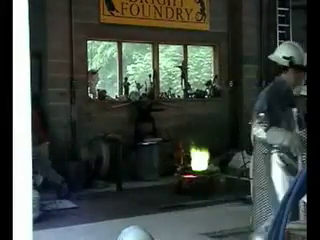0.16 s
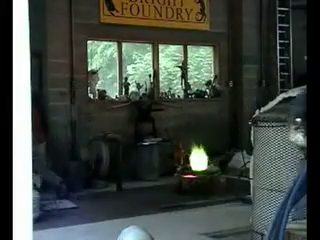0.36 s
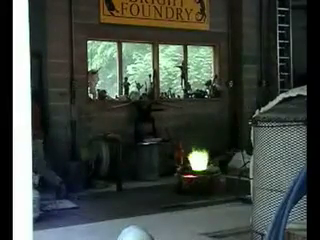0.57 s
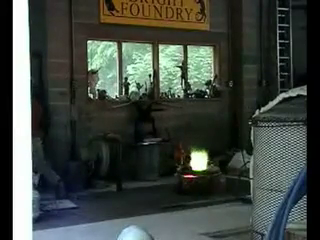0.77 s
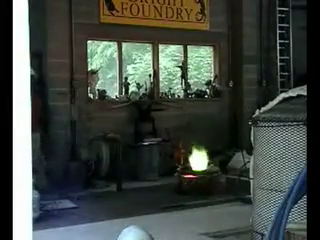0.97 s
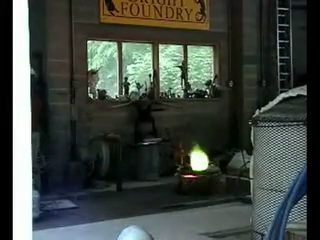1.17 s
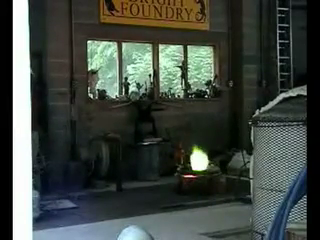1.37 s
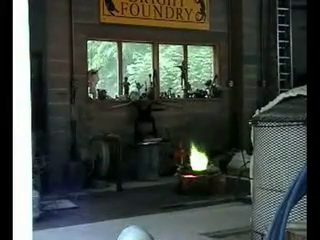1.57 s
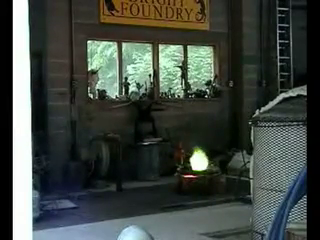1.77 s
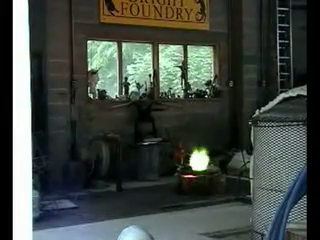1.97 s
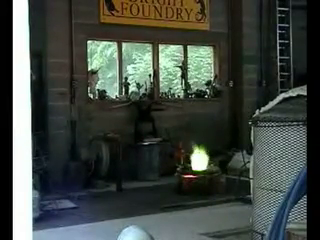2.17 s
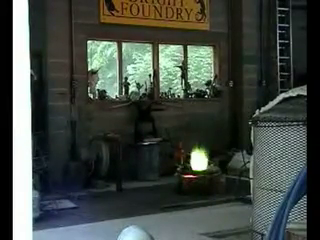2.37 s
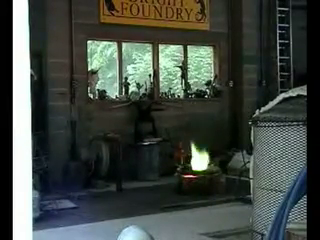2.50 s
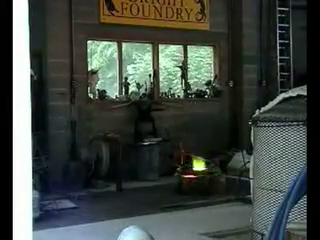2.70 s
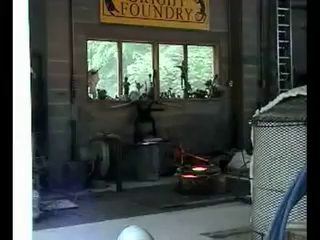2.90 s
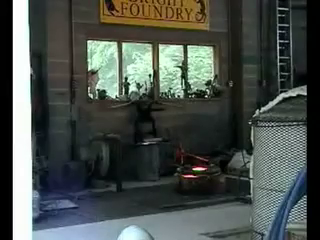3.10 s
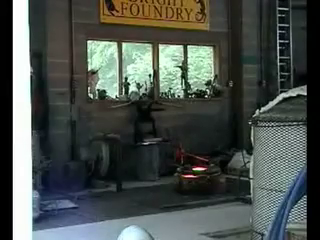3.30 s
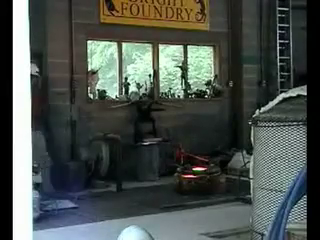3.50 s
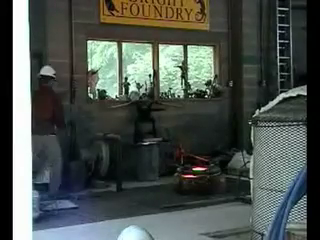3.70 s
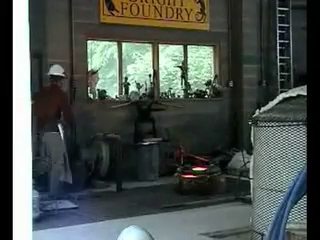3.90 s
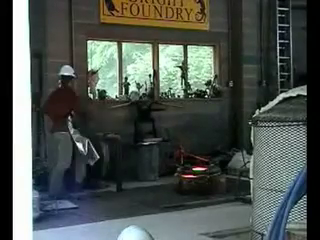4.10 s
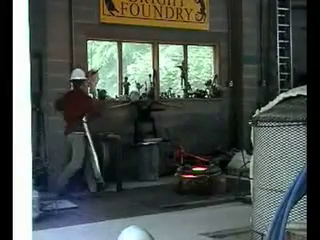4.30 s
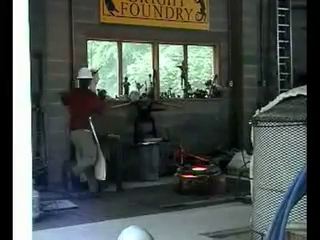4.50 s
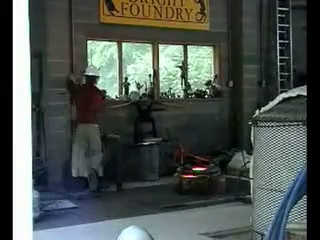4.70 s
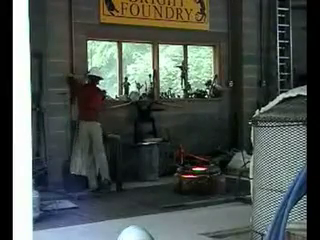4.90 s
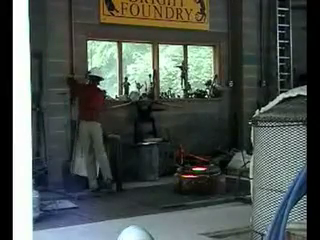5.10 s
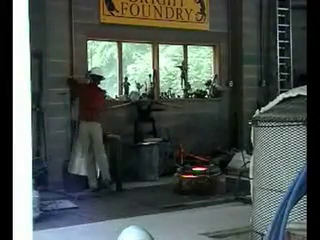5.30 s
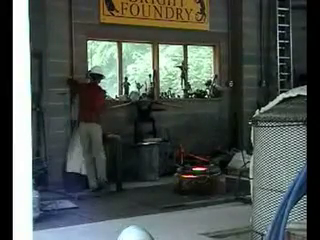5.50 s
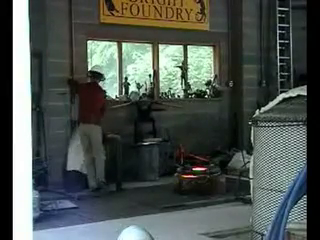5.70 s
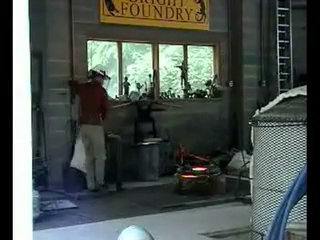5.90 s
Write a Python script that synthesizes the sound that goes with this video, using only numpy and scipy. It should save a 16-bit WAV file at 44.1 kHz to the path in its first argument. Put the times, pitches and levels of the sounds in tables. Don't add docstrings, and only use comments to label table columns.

```python
import sys
import numpy as np
from scipy import signal
from scipy.io import wavfile
from scipy.ndimage import uniform_filter1d

SR = 44100
rng = np.random.default_rng(int(sys.argv[2]) if len(sys.argv) > 2 else 0)


def gain_from_decibels(decibels):
    exponent = np.asarray(decibels, float) / 20
    return 10 ** exponent


def pcm_store(signal):
    levels = np.round(np.clip(np.atleast_2d(signal), -1, 1) * 32767)
    wavfile.write(sys.argv[1], SR, levels.astype(np.int16).T)


N = 267246
TIME = np.arange(N) / SR

# pitch_hz, width_hz, level_db
CHAMBER_MODES = [(166.6, 33.7, 0.5), (203.4, 30, -4)]
# pitch_hz, width_hz, level_db
FLUE_MODES = [(289, 23, 1.5), (350.6, 53, 3), (422.7, 60, -3.5), (520.3, 30, -5.5), (597, 23, -6),
              (707, 130, -2)]
# time_s, spread_s, duct_hum_db, flue_roar_db, hiss_db
SURGES = [(.03, .04, -5.5, 3, 1.5), (.13, .05, 1, -5.5, -1.5), (.28, 0.068, 1, 1.5, 2),
          (.66, 0.061, 6, 0.5, 3.5), (.9, 0.074, 3.5, -2.5, -0.5), (1.1, .1, 6.5, -0.5, 0),
          (1.28, .08, 0, 2.5, 1.5), (1.42, 0.046, -2, 1.5, 2), (1.7, 0.086, -0.5, 1, 1.5),
          (2.0, .12, 3, 1.5, 0), (2.35, 0.1, -2.5, 1, 1), (2.6, 0.057, -1.5, -0.5, 1.5)]
# pitch_hz, level_db (per Hz)
AIR_SPECTRUM = [(53, -41), (90, -21.5), (120, -7.5), (227, -7), (643, -3.5), (736, -12.5), (885, -13),
                (1200, -13), (1470, -16), (1650, -22), (1950, -16.5), (3450, -17), (3760, -17.5),
                (4600, -29)]
# pitch_hz, width_hz, level_db
CASING_MODES = [(744, 68, -12), (1216, 51, -13), (1449, 110, -1), (1934, 86, -3), (2697, 19, -5.5),
                (3814, 130, -1), (4200, 67, -10.5)]
# pitch_hz, level_db
LOWER_WHINE = [(715.7, 2.5), (730, -5), (710, -22.5)]
UPPER_WHINE = [(761, 3), (774, -7.5)]
HIGH_WHINE = [(3760, 0), (3668, -4), (3715, -11)]
# pitch_hz, level_db (above the air)
WEAK_ROTOR_TONES = [(1818, -20), (2546, -20), (2685, -22), (2730, -21.5), (3252, -25), (3962, -21.5),
                    (4161, -21), (4206, -26), (4388, -25)]
# pitch_hz, level_db (above the air)
SECOND_MOTOR_TONES = [(1208, -11.5), (1274, -23.5), (1454, -15), (1499, -22.5)]
PATH_LAGS = [0, .07, .16]
# time_s, spread_s, lower_db, upper_db
LICKS = [(.03, 0.085, 5, -1), (.45, .06, 8, 4.5), (.77, 0.04, 0, 6.5), (1.07, 0.037, 3, 7),
         (1.36, .06, 7, -1.5), (1.47, 0.06, -2.5, 8), (1.77, 0.035, 8, 5), (2.13, 0.054, 9, 0.5)]
# time_s, spread_s, lower_db, upper_db, high_db
CROSSING = [
    (3.2, 0.12, -1, -2, 4.5),
    (3.6, 0.42, 4.5, -2, 4.5),
    (4.15, 0.23, 0, 4, 1),
    (4.5, .1, 2, 2.5, 1.5),
    (5.0, 0.3, -4.5, 2, -4.5),
    (5.5, 0.42, -1, 4, 1),
]
# time_s, spread_s, level_db
FAINT_SWELL = (5.1, .5, 8)
# time_s, level_db
VALVE_LEVEL = [
    (2.03, -40),
    (2.1, -24),
    (2.2, -21),
    (2.26, -20),
    (2.35, -21.5),
    (2.38, -30),
    (2.45, -45),
]
# pitch_hz, width_hz, level_db
PIPE_MODES = [(1320, 33, -11), (1930, 26, -8), (2270, 37, -16), (2640, 30, -1), (2850, 25, -7),
              (3430, 40, -3), (3700, 60, -14), (4310, 35, -4)]
# time_s, spread_s
GRIP = [(2.25, .06), (2.22, .15), (2.3, .08), (2.23, .06), (2.31, .05), (2.26, .11), (2.3, .06),
        (2.28, .09)]
# time_s, level_db, length_s, centre_hz
SCUFFS = [
    (4.1, -38, 0.051, 1400),
    (1.78, -22, 0.05, 880),
    (2.4, -16.5, 0.025, 400),
    (4.48, -26.5, 0.023, 4000),
    (4.5, -26, 0.16, 1500),
]
# pitch_hz, width_hz, level_db
DUCT_MODES = [(122.1, 22, 0)]
# time_s, spread_s, rumble_db, duct_hum_db
DRAUGHT = [
    (3.5, 0.25, 3, 1.5),
    (4.25, .15, 3.5, 2.5),
    (5.35, .1, 3.5, 4),
    (5.75, 0.32, 6.5, 3.5),
]
# pitch_hz, level_db
MIRRORS = [(12100, -67), (16000, -62)]

SHUT_S, SHUT_SOFT_S = 2.712, .02
SHUT_DROP_DB = 3
BOOM_DB, BOOM_FADE_DB_S = -6.5, 52
ROAR_DB, ROAR_FADE_DB_S = -13, 107.5
RUMBLE_DB, JET_DB = -30.5, -30.5
FAN_DB, HISS_DB, AIR_DB = -27, 2, 2.5
LOWER_DB, UPPER_DB, HIGH_DB, FAINT_DB, SECOND_DB = -28.5, -32, -32.5, -42, -43
LICK_REST_DB = 2
HAZE_DB, FLUTTER_HOT_DB = -0.5, 4
WANDER_HOT, WANDER_COLD, WANDER_COAST = .012, .0009, .0045
CUT_S, COAST_SHARE, COAST_S = 5.75, .11, .3
HUM_DB, HUM_FADE_DB_S, HUM_COLD_DB = -16.5, 93, -34.5
FLOOR_DB, FLOOR_COLD_DB = -37, -40.5
GAIN_CREEP_DB, GAIN_CREEP_S = 5.5, 1.17
TOP_HZ, CLIP = 4585, .785


def flame():
    boom = body(CHAMBER_MODES) + gain_from_decibels(RUMBLE_DB) * body([(264, 230, 0)])
    boom_gain = gain_from_decibels(BOOM_DB - SHUT_DROP_DB * (1 - burning(400))) * burning(BOOM_FADE_DB_S)
    roar_db = ROAR_DB + swells(SURGES)[1] + 1.5 * walk(rate=16)
    jet = gain_from_decibels(JET_DB) * unit(ring(noise(), 1100, 900))
    roar = gain_from_decibels(roar_db) * body(FLUE_MODES) + jet
    return boom_gain * boom + burning(ROAR_FADE_DB_S) * roar


def blower():
    hot = burning(60)
    coast = 1 - np.exp(-after(CUT_S) / COAST_S)
    wander = WANDER_COLD + WANDER_HOT * hot + WANDER_COAST * coast
    speeds = [np.interp(TIME - lag, TIME, 1 - COAST_SHARE * coast) for lag in PATH_LAGS]
    paths = np.cumsum(speeds, axis=1) / SR
    turns = paths[0]

    flutter = FLUTTER_HOT_DB * hot * [walk(rate=10) for _ in range(3)]
    lower_db, upper_db, high_db = swells(CROSSING) + flutter
    lick_lower_db, lick_upper_db = swells(LICKS) - LICK_REST_DB * hot
    lower_db = LOWER_DB + lower_db + lick_lower_db + 5.8 * coast + 2.7 * bump(6.04, .08)
    upper_db = UPPER_DB + upper_db + lick_upper_db + 4.1 * coast
    high_db = HIGH_DB - 8 + high_db - 2.9 * hot - 14 * coast
    faint_db = FAINT_DB + swells([FAINT_SWELL])[0]
    second_db = SECOND_DB - 5.7 * hot + 6 * coast

    weak = whine(WEAK_ROTOR_TONES, turns, .6 * wander, waver_db=3)
    weak = weak + whine(SECOND_MOTOR_TONES, TIME, .7 * wander, waver_db=3)
    rush = gain_from_decibels(HISS_DB * hot + swells(SURGES)[2]) * air()
    out = gain_from_decibels(FAN_DB) * (rush + gain_from_decibels(HAZE_DB * hot - .5) * weak)
    out += gain_from_decibels(faint_db) * whine([(669, .0066)], turns, wander)
    out += gain_from_decibels(second_db) * whine([(1992, 0)], turns, wander)
    out += gain_from_decibels(lower_db) * whine(LOWER_WHINE, paths, .6 * wander, waver_db=1.2)
    out += gain_from_decibels(upper_db) * whine(UPPER_WHINE, paths, .6 * wander, waver_db=1.44)
    out += gain_from_decibels(high_db) * whine(HIGH_WHINE, turns, WANDER_COLD + .15 * wander, waver_db=2)
    return gain_from_decibels(creep_db()) * out


def air():
    hz, db = np.transpose(AIR_SPECTRUM)
    rush = 0
    for centre in 90 * 2 ** np.arange(0, 5.8, 1 / 3):
        band = unit(ring(ring(noise(), centre, centre / 3), centre, centre / 3))
        band_db = np.interp(np.log(centre), np.log(hz), db) + 1.2 * walk(rate=9)
        rush = rush + band * np.sqrt(centre) * gain_from_decibels(band_db)
    return gain_from_decibels(AIR_DB) * unit(rush) + gain_from_decibels(-7) * body(CASING_MODES)


def whine(lines, turns, wander, waver_db=0.0):
    out = 0
    for hz, db in lines:
        drift = np.cumsum(walk(rate=12) * wander) / SR
        waves = np.sin(2 * np.pi * hz * (np.atleast_2d(turns) + drift + rng.random()))
        out = out + gain_from_decibels(db + waver_db * walk(rate=14)) * np.sqrt(2) * waves.mean(axis=0)
    return out


def valve():
    start_s, end_s = VALVE_LEVEL[0][0], VALVE_LEVEL[-1][0]
    gate = np.clip(np.minimum(TIME - start_s, end_s - TIME) / .026, 0, 1)
    squeal = gain_from_decibels(-7.5) * bump(2.26, .11) * body([(3200, 2000, 0)])
    for (hz, width_hz, db), (s, spread) in zip(PIPE_MODES, GRIP):
        swell = .3 + bump(s, spread)
        tone = .7 * unit(ring(noise(), hz, width_hz)) + .8 * whine([(hz, 0)], TIME, .004)
        squeal = squeal + gain_from_decibels(db + 1.5 * walk(rate=25)) * swell * tone
    return gate * gain_from_decibels(curves(VALVE_LEVEL)[0] - 4) * squeal


def scuffs():
    return sum(gain_from_decibels(db) * bump(s, length) * unit(ring(noise(), hz, .52 * hz)) for s, db, length, hz in SCUFFS)


def duct():
    hot = burning(HUM_FADE_DB_S)
    rumble_db, draught_hum_db = swells(DRAUGHT)
    hum = .96 * body(DUCT_MODES) + .8 * np.sin(2 * np.pi * 119.6 * TIME)
    hum_gain = gain_from_decibels(HUM_DB + swells(SURGES)[0]) * hot + gain_from_decibels(HUM_COLD_DB + creep_db() + draught_hum_db)
    floor = gain_from_decibels(-4) * body([(55, 16, -5), (30, 30, -9)])
    floor_gain = gain_from_decibels(FLOOR_DB) * hot + gain_from_decibels(FLOOR_COLD_DB + creep_db() + rumble_db)
    return hum_gain * hum + floor_gain * floor


def noise():
    return rng.standard_normal(N)


def unit(x):
    return x / np.sqrt(np.mean(x ** 2))


def ring(x, hz, width_hz):
    return signal.lfilter(*signal.iirpeak(hz, hz / width_hz, SR), x)


def body(modes):
    return unit(sum(gain_from_decibels(db) * unit(ring(ring(noise(), hz, w), hz, 1.87 * w)) for hz, w, db in modes))


def walk(rate):
    hold = int(SR / rate)
    steps = np.repeat(rng.standard_normal(N // hold + 1), hold)
    return unit(uniform_filter1d(uniform_filter1d(steps, hold), hold)[:N])


def curves(table):
    s, *columns = np.transpose(table)
    return [np.interp(TIME, s, c) for c in columns]


def bump(s, spread):
    return np.exp(-((TIME - s) / spread) ** 2)


def swells(table):
    return sum(np.outer(row[2:], bump(*row[:2])) for row in table)


def after(s, soft=.02):
    return soft * np.logaddexp(0, (TIME - s) / soft)


def burning(fade_db_s):
    return gain_from_decibels(-fade_db_s * after(SHUT_S, SHUT_SOFT_S))


def creep_db():
    return GAIN_CREEP_DB * (1 - np.exp(-after(SHUT_S) / GAIN_CREEP_S))


def scene():
    return (flame() + blower() + valve() + scuffs() + duct())[None]


def starve(x, edge_hz=4100, share=.08, frame=576):
    lost = np.repeat(rng.random(N // frame + 1) < share, frame)[:N]
    top = signal.sosfiltfilt(signal.butter(6, edge_hz, "high", fs=SR, output="sos"), x)
    return x - top * uniform_filter1d(1. * lost, size=200)


def limit(x):
    level = uniform_filter1d(np.abs(x), size=900)
    return x * np.maximum(level / .4, 1) ** -.6


def haze(shaved, db=-10.5):
    above = signal.butter(8, 4750, "high", fs=SR, output="sos")
    spread = np.sqrt(np.abs(uniform_filter1d(signal.sosfilt(above, shaved) ** 2, size=1800)))
    return gain_from_decibels(db) * spread * unit(signal.sosfilt(above, ring(noise(), 4800, 1200)))


def roll_off(x):
    return signal.sosfilt(signal.butter(12, 15870, fs=SR, output="sos"), x)


def record(dry):
    narrow = signal.ellip(10, .5, 45, TOP_HZ, fs=SR, output="sos")
    full = limit(starve(signal.sosfiltfilt(narrow, dry)))
    clipped = np.clip(full, -CLIP, CLIP)
    images = sum(gain_from_decibels(db) * np.cos(2 * np.pi * hz * TIME) for hz, db in MIRRORS)
    mix = clipped * (1 + images) + haze(full - clipped)
    mix = signal.sosfilt(signal.butter(2, 13500, fs=SR, output="sos"), mix)
    mix = signal.sosfilt(signal.butter(1, 14, "high", fs=SR, output="sos"), mix)
    return roll_off(mix)


dry = scene()
out = record(dry)
pcm_store(out)
```